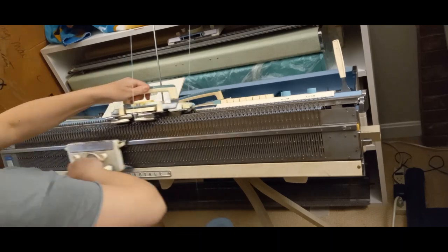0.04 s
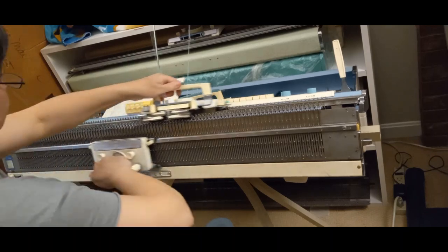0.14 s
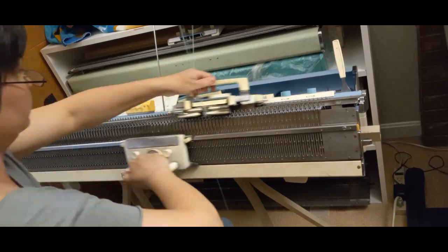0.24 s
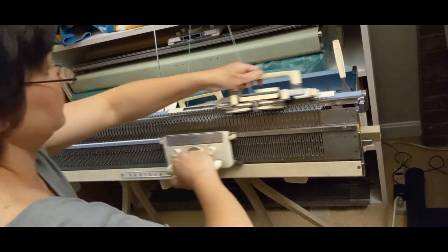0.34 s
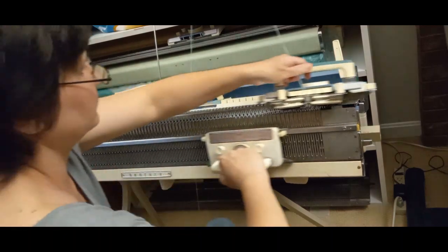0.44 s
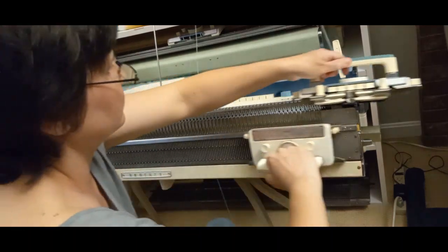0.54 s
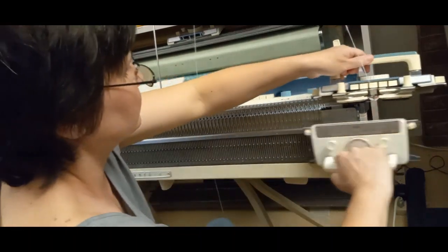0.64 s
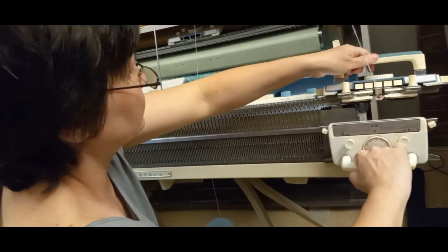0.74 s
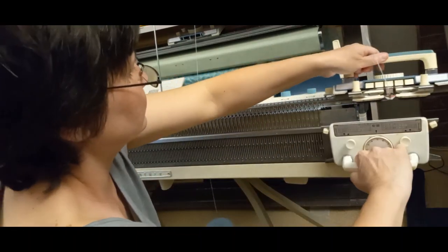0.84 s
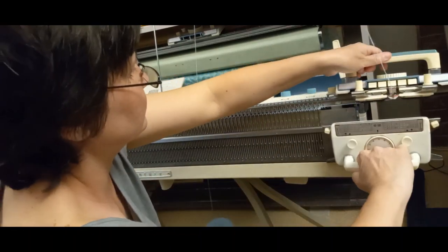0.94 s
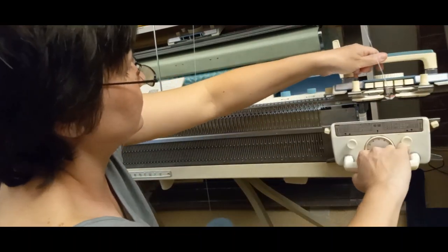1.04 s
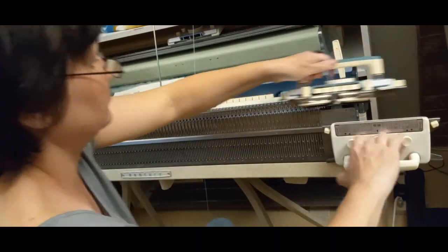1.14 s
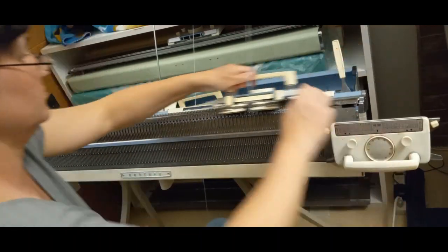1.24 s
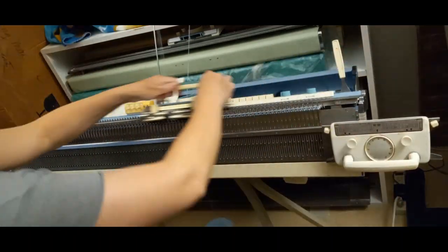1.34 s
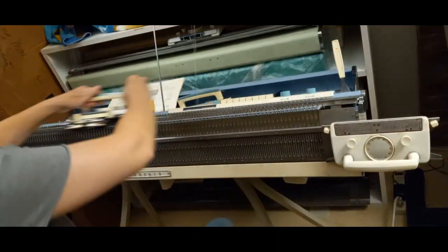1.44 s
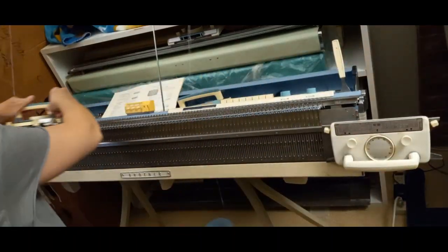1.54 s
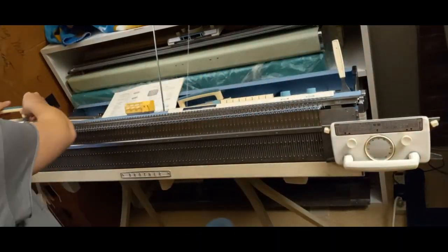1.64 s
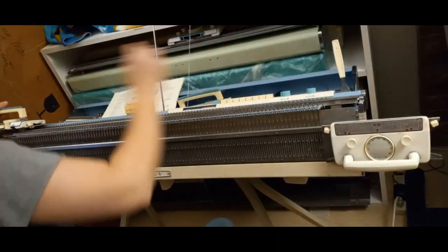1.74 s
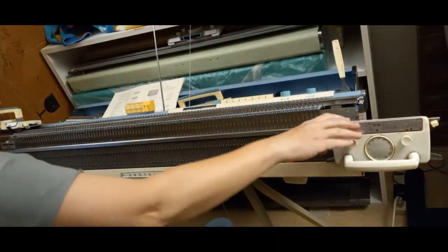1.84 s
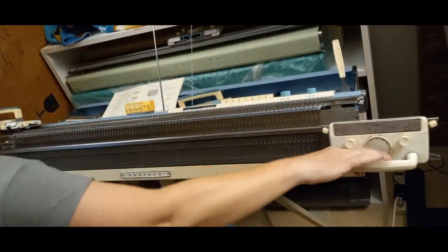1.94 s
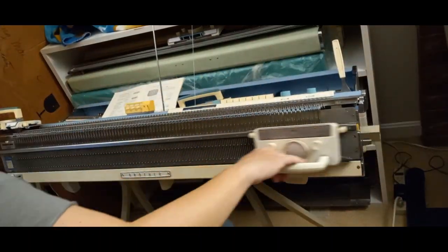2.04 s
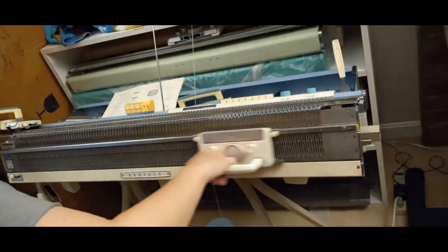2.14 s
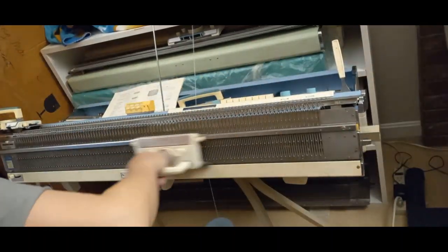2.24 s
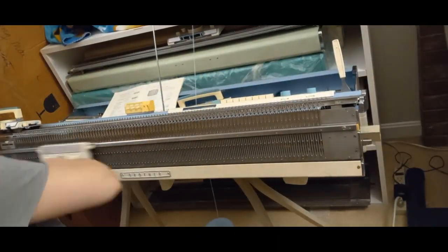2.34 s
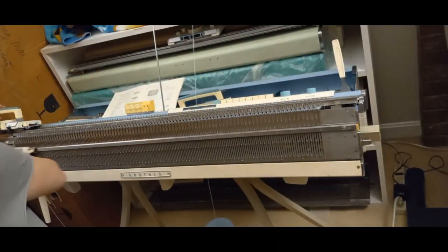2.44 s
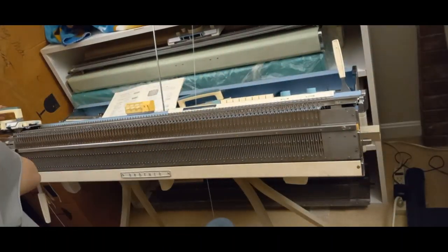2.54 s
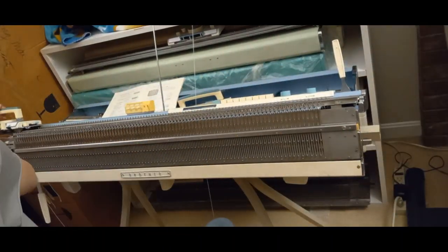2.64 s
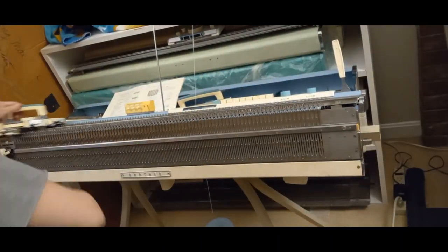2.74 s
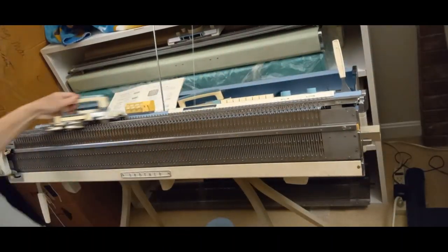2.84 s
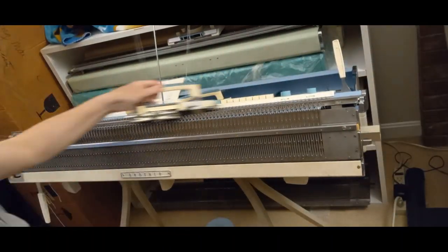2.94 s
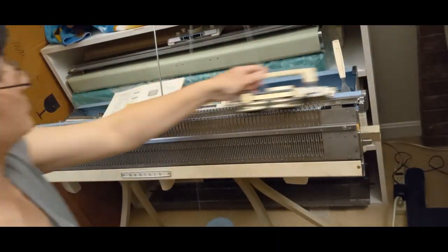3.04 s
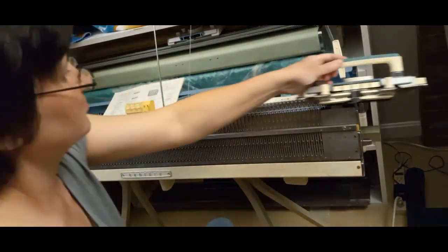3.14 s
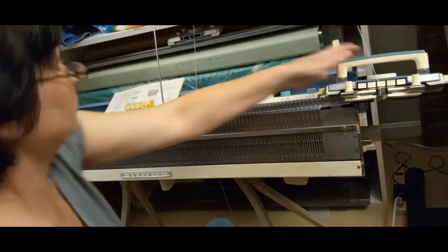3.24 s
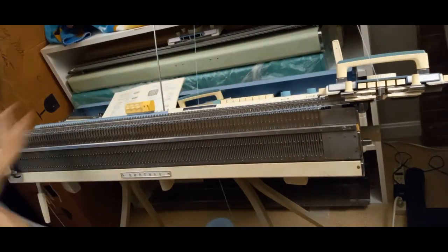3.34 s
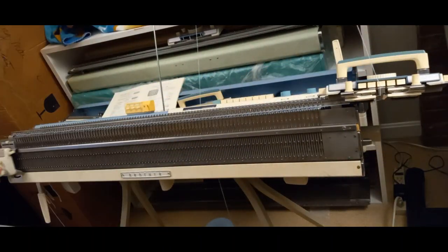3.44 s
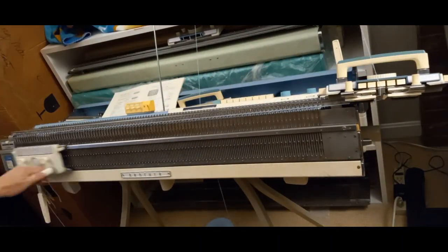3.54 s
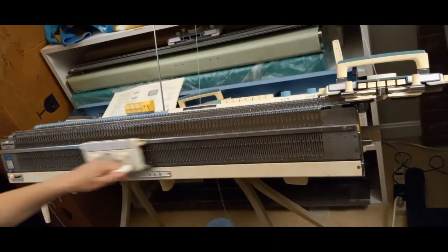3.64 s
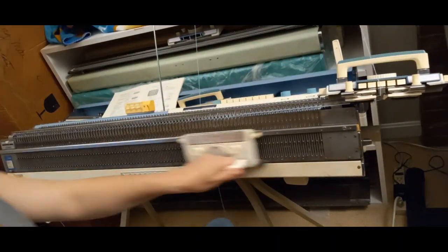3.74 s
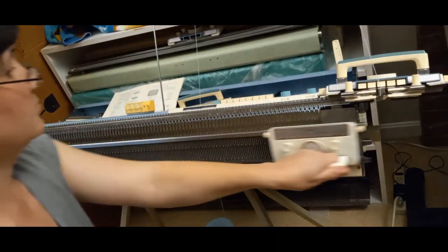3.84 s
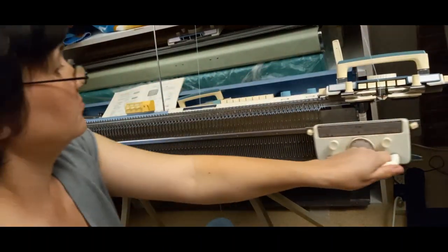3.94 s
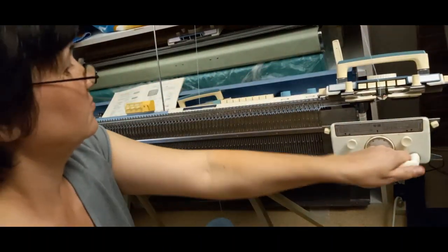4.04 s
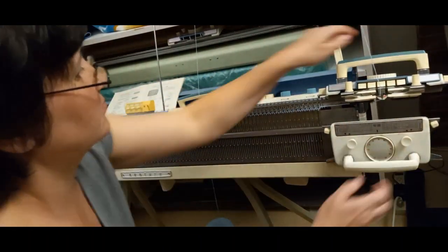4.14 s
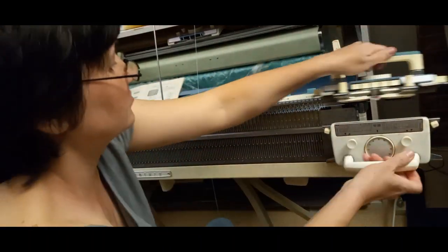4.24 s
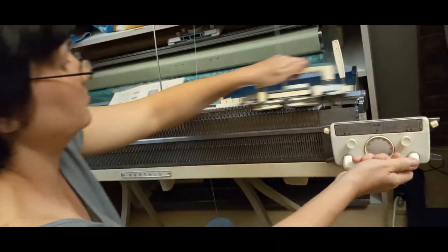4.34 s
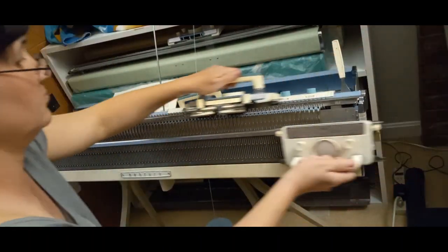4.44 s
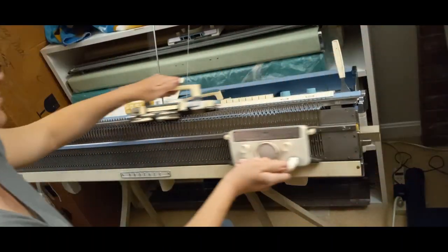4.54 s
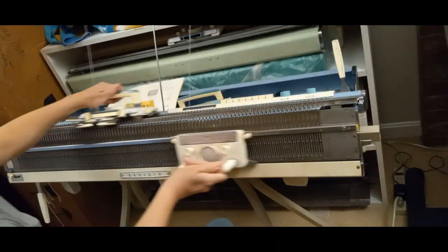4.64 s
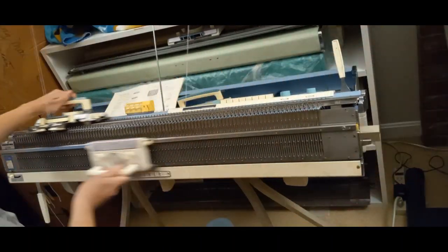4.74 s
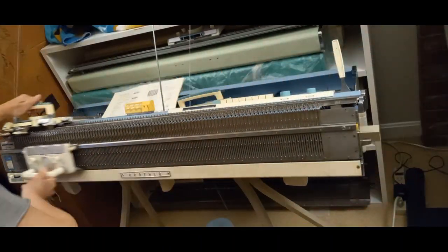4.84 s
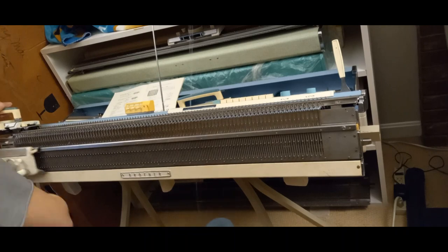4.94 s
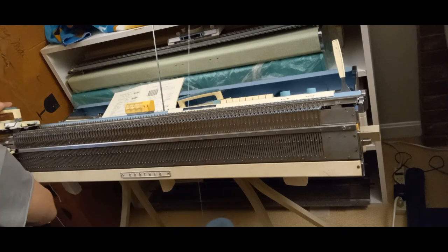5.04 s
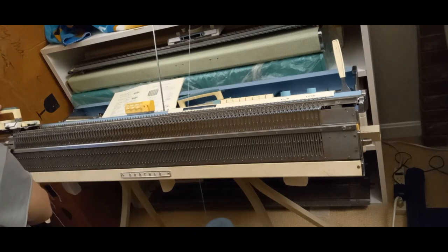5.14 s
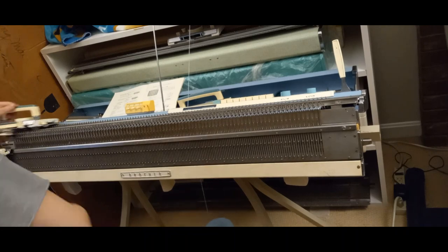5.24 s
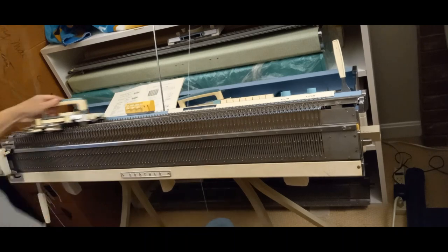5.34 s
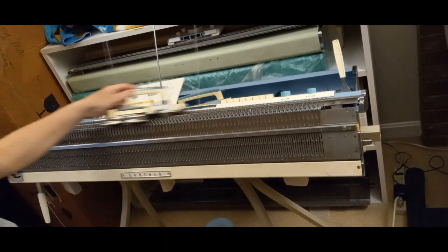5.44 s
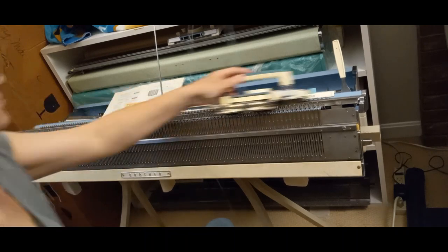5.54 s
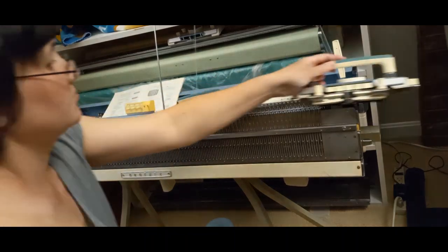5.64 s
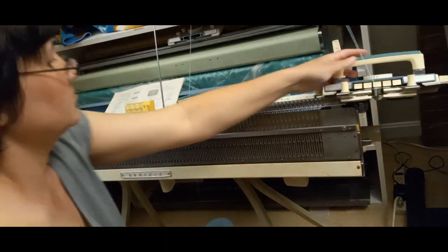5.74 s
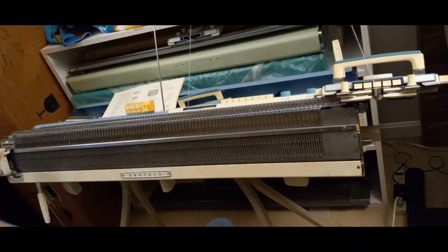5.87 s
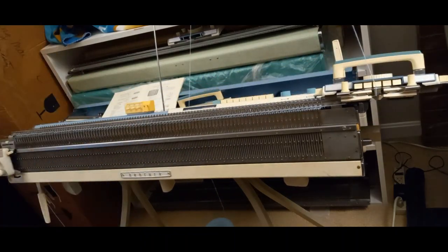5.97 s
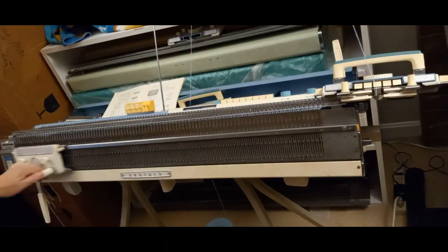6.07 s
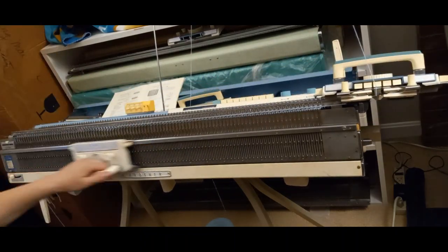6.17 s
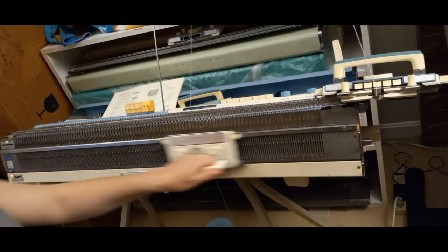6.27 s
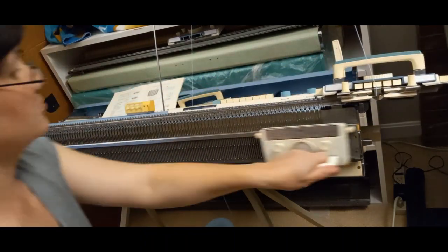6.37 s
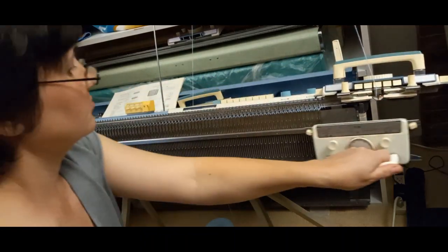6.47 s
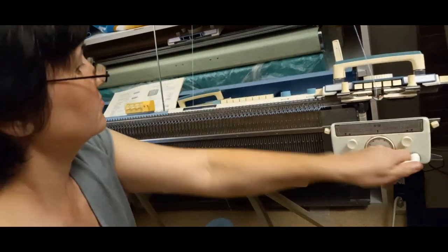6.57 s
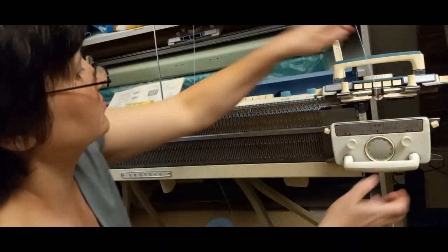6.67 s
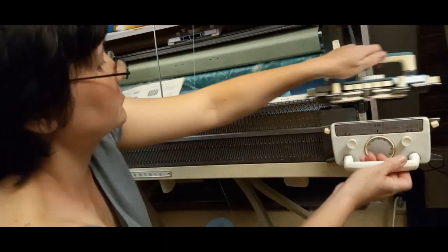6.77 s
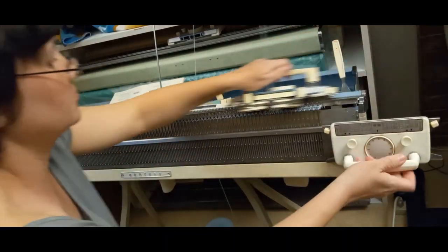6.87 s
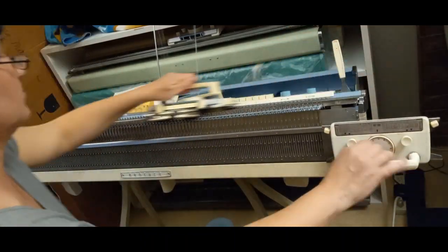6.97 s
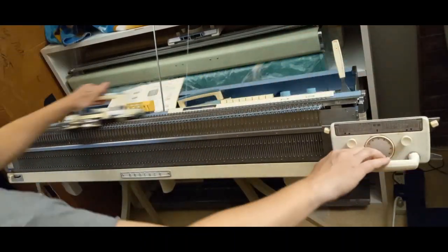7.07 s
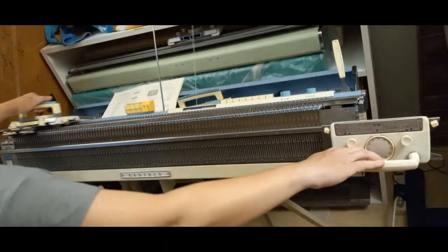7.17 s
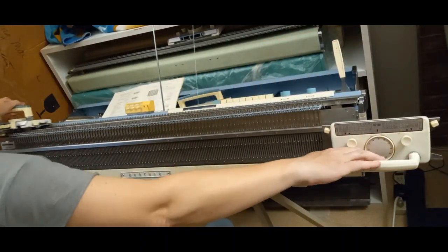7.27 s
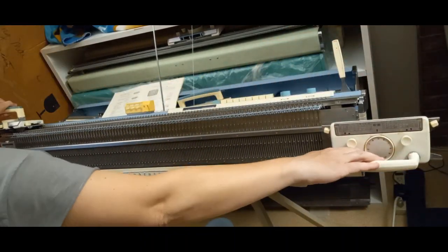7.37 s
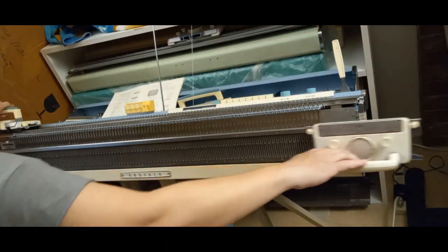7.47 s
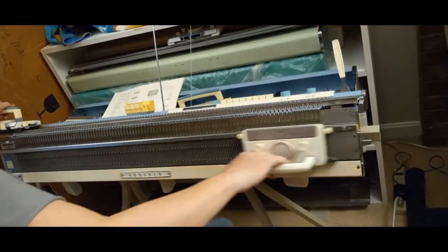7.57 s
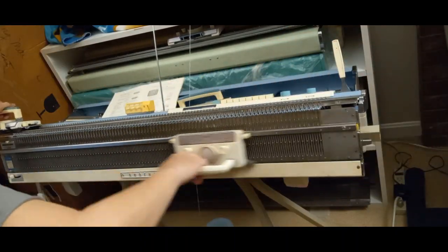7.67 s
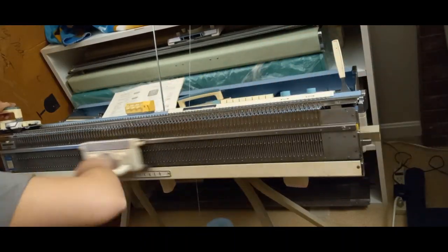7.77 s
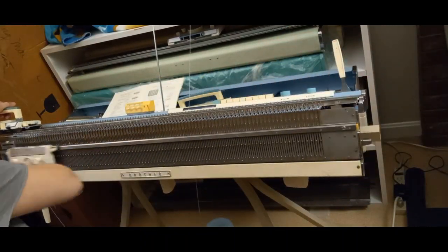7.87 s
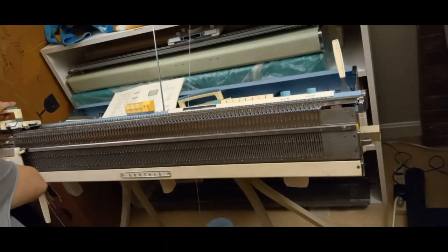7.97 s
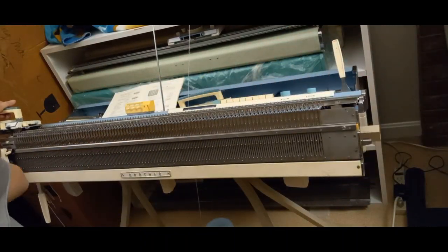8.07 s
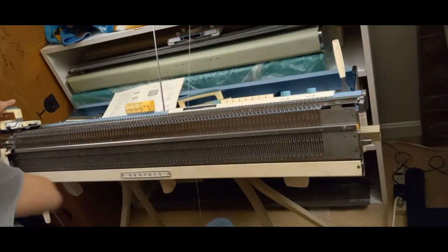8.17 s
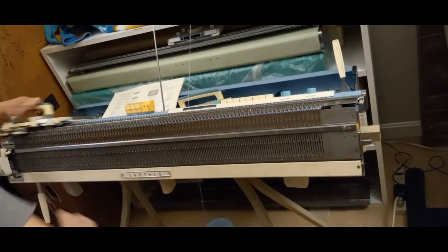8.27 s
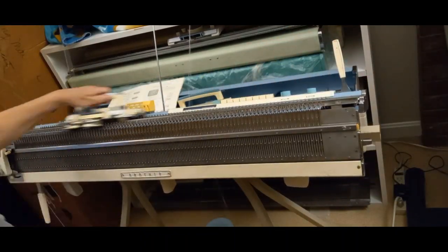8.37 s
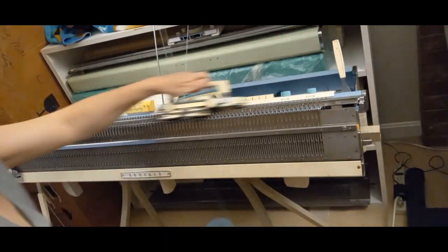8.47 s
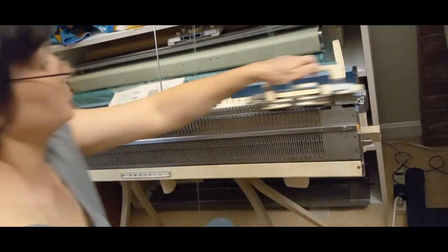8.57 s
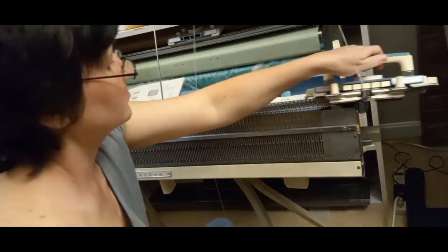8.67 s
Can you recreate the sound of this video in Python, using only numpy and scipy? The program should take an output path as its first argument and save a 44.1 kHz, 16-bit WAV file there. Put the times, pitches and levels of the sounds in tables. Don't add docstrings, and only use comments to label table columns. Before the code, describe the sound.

A hand knitting machine is heard very close in a small room. Two carriages are already sliding, with a gritty metallic rasp and a faint wavering tone near 480 hertz; a sharp snap comes at 0.67 and they stop by 0.75. A lever clacks at 0.98. Rasping passes follow at about 1.2-1.7, 2.05-2.6, 2.8-3.2, 3.5-4.0, 4.3-5.1 (two overlapping carriages), 5.3-5.7, 6.05-6.5, 6.8-7.35 and 7.55-8.1 seconds. Each gathers quickly, rattles densely with bright ringing steel and low shell rumble, then brakes into ticks. Hard snaps strike near 5.35, 6.08 and 8.34; strong lever clacks near 3.5, 5.17 and 6.01. Rests hold small finger ticks, soft rubbing, dull hum and thin hiss. A last bright pass starts at 8.3 and is still sounding or just braking at the end.

```python
import sys
import numpy as np
from scipy import signal
from scipy.fft import rfft, irfft, next_fast_len
from scipy.io import wavfile

SR = 44100
rng = np.random.default_rng(int(sys.argv[2]) if len(sys.argv) > 2 else 0)


def int16_out(signal):
    q = np.round(np.clip(np.atleast_2d(signal).T, -1, 1) * 32767)
    wavfile.write(sys.argv[1], SR, q.astype(np.int16))


def gain_from_db(level_db):
    decades = np.asarray(level_db, float) / 20
    return 10 ** decades


N = 384111


def rms_one(x):
    return x / np.sqrt(np.mean(x ** 2) + 1e-20)


def peak_one(x):
    return x / np.abs(x).max()


def at_bins(points):
    size = next_fast_len(N)
    hz = np.maximum(np.arange(size // 2 + 1) * SR / size, 5)
    table_hz, table_db = np.array(points)[:, 0], np.array(points)[:, 1]
    return np.interp(np.log(hz), np.log(table_hz), table_db)


def shape(x, gain_db):
    size = next_fast_len(N)
    return irfft(rfft(x, size) * gain_from_db(gain_db), size)[..., :N]


def colour(x, points):
    return rms_one(shape(x, at_bins(points)))


def drift(rate):
    r = np.exp(-80 * np.pi * rate / SR)
    noise = rng.standard_normal(N // 40 + 2002)
    slow = signal.lfilter([1], [1, -2 * r, r * r], noise)[2000:]
    return np.interp(np.arange(N) / 40, np.arange(len(slow)), rms_one(slow))


def struck(x, hz, radius):
    w = 2 * np.pi * hz / SR
    return signal.lfilter([0, np.sin(w)], [1, -2 * radius * np.cos(w), radius ** 2], x)


def resonances(x, peaks, patchy_db, rate):
    out = 0
    for k, (hz, width_hz, level_db) in enumerate(peaks):
        r = np.exp(-np.pi * width_hz / SR)
        poles = [1, -2 * r * np.cos(2 * np.pi * hz / SR), r * r]
        band = signal.lfilter([1, 0, -1], poles, x) * (1 - r * r) / 2
        out = out + (-1) ** k * gain_from_db(level_db + patchy_db * drift(rate)) * band
    return rms_one(out)


def rattle(per_s, spread_db, alike):
    chance, luck = rng.random((3, N)), rng.random((3, N))
    hit, sizes = chance < per_s / SR, np.zeros((3, N))
    uneven = -np.log(np.abs(2 * luck[hit] - 1) + 1e-9)
    sizes[hit] = gain_from_db(spread_db * np.minimum(uneven, 4)) * np.sign(luck[hit] - .5)
    both, left, right = sizes / np.sqrt(per_s)
    alike = np.clip(alike, 0, 1)
    return rms_one(np.sqrt(alike) * both + np.sqrt(1 - alike) * np.array([left, right]))


def room_levels():
    # start_s, end_s, hum_db, hiss_start_db, hiss_end_db
    pauses = [(0.764, 1.133, -48, -50, -49), (1.733, 2.005, -49, -61, -46), (2.61, 2.78, -53, -62, -61),
              (3.26, 3.47, -50, -51, -52), (4.04, 4.273, -51, -63, -52), (5.2, 5.3, -48, -65, -52),
              (5.77, 6.015, -50.5, -64, -45), (6.575, 6.803, -50.5, -56, -51), (7.383, 7.53, -50, -58, -46),
              (8.112, 8.3, -49.5, -54, -50.5)]
    # middle_s, half_length_s, level_db
    hand_rubs = [(1.07, 0.1, -53), (1.983, 0.06, -53), (2.615, 0.066, -56), (3.363, 0.077, -46.5),
                 (4.05, 0.13, -52.5), (5.19, 0.065, -53), (5.793, 0.044, -53), (6.604, .05, -65),
                 (7.385, .05, -63), (8.115, 0.035, -50)]
    rub_rest_db = -60.5
    recovery_db_per_s = 16
    t = np.arange(N) / SR
    start, end, hum_db, *hiss_db = np.transpose(pauses)
    s = np.ravel([start, end], "F")
    open_s = np.ravel([0 * start, end - start], "F")
    rub = gain_from_db(rub_rest_db)
    rub = rub + sum(gain_from_db(db) * np.exp(-((t - mid) / half) ** 2) for mid, half, db in hand_rubs)
    hum = gain_from_db(np.interp(t, s, np.repeat(hum_db, 2) + recovery_db_per_s * open_s))
    hiss = gain_from_db(np.interp(t, s, np.ravel(hiss_db, "F")))
    return hum, rub, hiss


def room_tone():
    # frequency_hz, density_db
    hum_spectrum = [(90, -26), (200, -13), (324, 1), (480, -1.5), (620, -7), (1000, -9.5), (1500, -18),
                    (3000, -26)]
    hiss_spectrum = [(200, -45), (1000, 9), (3000, 2.5), (6000, -1), (10000, -4.5), (16000, -5)]
    # frequency_hz, width_hz, level_db
    hum_tones = [(331, 12, 0), (487.4, 3.4, 3.5)]
    rub_peaks = [(1250, 180, 4.5), (1590, 1200, 0), (1750, 110, 5), (2140, 550, -10)]
    hum_gain, rub_gain, hiss_gain = room_levels()
    noise = rng.standard_normal((5, N))
    shared = 0.48 * noise[0] + noise[1:3]
    tones = resonances(shared[::-1], hum_tones, patchy_db=7.5, rate=9.0)
    hum = colour(shared, hum_spectrum) + gain_from_db(-6.5) * colour(tones, hum_spectrum)
    rub = resonances(rattle(per_s=1500, spread_db=3.0, alike=0.45), rub_peaks, patchy_db=2.5, rate=16)
    rub = signal.sosfilt(signal.butter(2, [900, 3000], "band", fs=SR, output="sos"), rub)
    out = hum * hum_gain * gain_from_db(-2.0 + 1.1 * drift(6.8)) + rub * rub_gain * gain_from_db(-3.0)
    return out + colour(noise[3:], hiss_spectrum) * hiss_gain * gain_from_db(-1 + 1.3 * drift(24))


def room(x):
    t60_s = 0.8
    t = np.arange(12000) / SR
    tail = rng.standard_normal((2, len(t))) * gain_from_db(-60 * t / t60_s) * (t > .004)
    tail = signal.lfilter([.5], [1, -.5], tail)
    return signal.fftconvolve(x, tail / np.sqrt(np.sum(tail ** 2) / 2), axes=1)[:, :N]


def squeal():
    start_s, end_s, pitch_hz = .09, .72, 480
    level_db, sag_db_per_s = -40.5, 8
    t = np.arange(N) / SR
    phase = 2 * np.pi * np.cumsum(pitch_hz + 3.5 * drift(21)) / SR
    fade = np.clip(np.minimum(t - start_s, end_s - t) / .05, 0, 1)
    return fade * gain_from_db(level_db - sag_db_per_s * t + 2.3 * drift(13)) * np.sin(phase)


def tick_list():
    # start_s, peak_db, top_minus_peak_db
    stops = [(0.724, -34, -8), (1.6993, -21.5, 3.5), (2.58, -21, -3.5), (3.2296, -24.5, 2.5),
             (4.02, -28.5, -2), (5.096, -23.5, -4), (5.7445, -25.5, 5.5), (6.554, -22.5, -6),
             (7.3511, -20, 1.5), (8.081, -22, -3)]
    # start_s, peak_db, ring_minus_peak_db, ring_hz, top_minus_peak_db
    levers = [(0.9795, -11, -16, 2040, -14.5), (1.9023, -34, 2.5, 3950, 9.5), (3.489, -14.5, -9, 1900, -21),
              (4.28, -28, -22, 1900, 6.5), (5.1716, -10, -14.5, 1816, -20),
              (6.0133, -13.5, -6.5, 1860, -10), (6.642, -26.5, 0.5, 3950, -18)]
    # start_s, peak_db,
    # ring_minus_peak_db
    catches = [(0.661, -19, -17), (1.1873, -24, -22), (1.558, -20, -17), (2.037, -28, -2),
               (2.0537, -9, -12), (2.8233, -26, -15), (3.498, -23, -4), (3.5394, -12.5, -8),
               (4.3194, -28, 2), (5.012, -16.5, -7), (5.3284, -28, -28), (6.024, -23, -6),
               (6.0795, -20, -6), (7.546, -26, -23), (7.568, -14, -10), (7.604, -13, -6),
               (8.322, -15.5, -17)]
    # start_s, peak_db, ring_hz, top_minus_peak_db
    touches = [(1.1293, -36, 2110, 1), (1.1626, -47, 1310, -12), (2.0144, -35, 1460, -14),
               (2.63, -44, 1790, -15), (2.652, -41, 1800, -16), (3.3045, -35.5, 1714, -8),
               (3.3796, -33.5, 1750, -11), (4.127, -38, 3800, -15), (4.1864, -52, 1100, 4),
               (5.152, -39, 1250, -14), (5.2714, -46, 1230, -6), (5.8177, -36.5, 1740, -4),
               (5.922, -57, 1120, -11), (6.801, -33, 1330, -1.5), (6.844, -25, 1330, -6),
               (8.256, -42, 1190, -12)]
    ticks_all = [(s, db, -13.5, 1900, top_db, 0.048) for s, db, top_db in stops]
    ticks_all += [(*row, 0.044) for row in levers]
    ticks_all += [(s, db, ring_db, 1687, -5, 0.034) for s, db, ring_db in catches]
    ticks_all += [(s, db, -4.5, hz, top_db, 0.073) for s, db, hz, top_db in touches]
    return ticks_all


def ticks():
    # multiple_of_ring_hz, level_db, multiple_of_t60
    latch_modes = [(1, -7.5, 1.1), (.84, -19, .8), (1.17, -10.5, .8)]
    spring_hz, spring_width_hz = 3800, 2300
    out, span = np.zeros((2, N + SR)), 5000
    t = np.arange(span) / SR
    body = signal.butter(2, [2300, 7000], "band", fs=SR, output="sos")
    bright = signal.butter(2, 6500, "high", fs=SR, output="sos")
    small = signal.butter(3, 1250, "high", fs=SR, output="sos")
    for s, peak_db, ring_db, centre_hz, top_db, t60 in tick_list():
        t60 = max(t60, .01)
        fall = (gain_from_db(-60 * t / t60) + 1.4 * gain_from_db(-60 * t / 0.0018)) * np.minimum(t / 0.00025, 1)
        chatter, fizz = rng.standard_normal((2, 2, span)) * fall
        chatter = chatter + 0.18 * chatter[::-1]
        spring = struck(chatter, spring_hz, np.exp(-np.pi * spring_width_hz / SR))
        snap = signal.sosfilt(body, chatter) + 0.52 * spring
        ring = 0.25 * peak_one(struck(chatter, centre_hz, np.exp(-np.pi * 600 / SR)))
        blow = (t == t[20]) + 0.088 * chatter
        shorter = min(1, 1900 / centre_hz) ** 2
        for ratio, level_db, longer in latch_modes:
            radius = gain_from_db(-60 / (longer * t60 * SR * shorter))
            ring += gain_from_db(level_db) * struck(blow, ratio * centre_hz, radius)
        tick = gain_from_db(2.0) * peak_one(snap) + gain_from_db(top_db + 9.5) * peak_one(signal.sosfilt(bright, fizz))
        tick += gain_from_db(ring_db + 5.0) * peak_one(ring)
        at = round(s * SR)
        out[:, at:at + span] += gain_from_db(peak_db) * signal.sosfilt(small, tick)
    return out[:, :N]


def snaps():
    # start_s, peak_db, left_minus_right_db
    needles = [(0.671, 4, -8), (1.557, -18, 0.0), (2.054, -10, 0.5), (2.826, -9, 0.5), (3.55, -14, 0.5),
               (4.017, -13.5, -5), (4.974, -18, 11), (5.012, -7, 1.0), (5.059, -21, 0.0), (5.094, -8.5, -8),
               (5.345, 2, 5), (6.079, 3, -1), (6.553, -21, -18), (8.34, 2, 0.5)]
    out = np.zeros((2, N))
    for s, peak_db, pan_db in needles:
        out[:, round((s + .0015) * SR)] = gain_from_db(peak_db + np.array([.5, -.5]) * pan_db)
    return signal.lfilter([.9, .3, -.5], [1, -.55], out)


def pass_controls():
    # full_speed_s, brake_s, rest_s, full_speed_db, brake_start_db
    back_right = [(2.821, 3.136, 3.225, -22.5, -28), (5.332, 5.652, 5.73, -23, -27),
                  (8.341, 8.646, 8.73, -22.5, -28)]
    back_left = [(1.24, 1.589, 1.68, -25.5, -23.5), (4.373, 4.893, 5.03, -25.5, -28),
                 (6.896, 7.176, 7.36, -25, -24)]
    front_right = [(3.543, 3.903, 4.008, -23.5, -29.5), (6.084, 6.456, 6.545, -24, -29)]
    front_left = [(2.067, 2.486, 2.58, -25.5, -29), (4.62, 5.009, 5.1, -28.5, -32.5),
                  (7.592, 7.984, 8.09, -24.5, -30.5)]
    opening_back = [(0.0, 0.59, 0.75, -28.5, -29)]
    opening_front = [
        (0.0, 0.59, 0.74, -30.5, -33.5),
        (0.672, 0.694, 0.742, -26, -28),
    ]
    # rise_s, breakaway_loss_db, front_bed_share (0-1), plate_minus_rasp_db
    pushes = [
        (0.024, -16, 0.04, -11.5),
        (0.093, -27.5, 0.02, -11),
        (0.035, -26, 0.8, -13.5),
        (.045, -14, 0.95, -12),
    ]
    # grit_minus_rasp_db, grit_gain_over_pass_db, rumble_minus_rasp_db, rumble_gain_over_pass_db
    mixes = [
        (-0.5, -0.5, -5.5, -3),
        (-1.5, -1.5, -4.5, -4.5),
        (0, 3, -2.5, -11.5),
        (0.5, 2.5, -9, 1),
    ]
    gather_power, stick_db_per_s = 1.2, 3000
    brake_loss_db, brake_power = -23, 1.45
    halt_db_per_s = 500
    jolt_db, jolt_s = 1.5, 0.013
    creep_db, slow_dull_db = 12.5, -4.5

    t, power, front = np.arange(N) / SR, np.zeros((4, N)), np.zeros(N)
    kinds = (opening_back + back_right, back_left, opening_front + front_right, front_left)
    for rows, push, mix in zip(kinds, pushes, mixes):
        rise_s, start_db, share, plate_db = push
        grit_db, grit_gain_db, rumble_db, rumble_gain_db = mix
        for full_s, brake_s, rest_s, full_db, brake_db in rows:
            on = (t > full_s - rise_s - .05) & (t < rest_s + .1)
            s = t[on]
            along = np.clip((s - full_s) / (brake_s - full_s), 0, 1)
            slow = np.maximum(full_s - s, 0) / rise_s
            braked = np.maximum(s - brake_s, 0) / (rest_s - brake_s)
            creep = np.minimum(slow + braked, 1)
            lost_db = start_db * slow ** gather_power + brake_loss_db * braked ** brake_power
            lost_db -= stick_db_per_s * np.maximum(full_s - rise_s - s, 0)
            lost_db -= halt_db_per_s * np.maximum(s - rest_s, 0)
            rasp_db = full_db + (brake_db - full_db) * along + lost_db
            thump_db = jolt_db * np.exp(-np.abs(s - full_s) / jolt_s) + creep_db * creep
            layers_db = [0 * s,
                         grit_db + grit_gain_db * along + slow_dull_db * creep,
                         rumble_db + rumble_gain_db * along + thump_db,
                         plate_db + 0 * s]
            power[:, on] += gain_from_db(rasp_db + layers_db) ** 2
            front[on] += np.clip(share, 0, 1) * gain_from_db(rasp_db) ** 2
    return np.sqrt(power), np.clip(front / (power[0] + 1e-30), 0, 1)


def carriages():
    # frequency_hz, width_hz, level_db
    back_bed = [(2737, 220, 6), (3285, 51, 5.5), (4420, 1120, 5)]
    front_bed = [(3390, 130, 0.5), (4170, 240, 9.5), (5800, 200, 3)]
    plate_peaks = [(1520, 130, -7.5), (1860, 250, 6.5), (1935, 460, 0.5)]
    cam_peaks = [(2060, 1000, -7), (3590, 950, -0.5), (5800, 810, -4)]
    shell_peaks = [(287, 174, -0.5), (475, 79, 5.5), (685, 540, -1.5), (1340, 290, 4)]
    # frequency_hz, density_db
    grit_spectrum = [(20, -3), (200, -5), (1000, -6), (4000, -3), (8000, -1), (12000, -2), (16000, -1.5)]
    full_speed_db = -27
    (rasp, grit, rumble, ring), front = pass_controls()
    speed = np.clip(rasp / gain_from_db(full_speed_db), .12, 1)
    butts = rattle(3000.0 * speed, spread_db=3.0, alike=0.28)
    bed = np.sqrt(1 - front) * resonances(butts, back_bed, patchy_db=3.0, rate=5.2)
    bed += np.sqrt(front) * resonances(butts, front_bed, patchy_db=1.5, rate=6)
    plate = resonances(butts, plate_peaks, patchy_db=2.5, rate=7.3)
    latches = rattle(5000.0 * speed, spread_db=2.0, alike=0.21)
    cams = resonances(latches, cam_peaks, patchy_db=0.0, rate=4.2)
    shell = resonances(latches, shell_peaks, patchy_db=1.5, rate=6.4)
    fine = colour(rattle(9000.0 * speed, spread_db=3.0, alike=0.011) + 0.27 * butts, grit_spectrum)
    judder = gain_from_db(0.57 * drift(37) + 0.7 * drift(92))
    steel = rasp * (gain_from_db(-5) * bed + gain_from_db(-4.0) * cams) + grit * gain_from_db(6) * fine + ring * plate
    return judder * steel + rumble * gain_from_db(-3.0) * shell


def scene():
    reverb_db = -27
    hits = ticks() + snaps()
    return room_tone() + gain_from_db(reverb_db) * room(hits) + hits + squeal() + carriages()


def band_limit(x):
    return signal.sosfilt(signal.butter(12, 16990, fs=SR, output="sos"), x)


def record(dry):
    # frequency_hz, difference_db
    tilt = [(100, -2.5), (1000, -1.4), (3000, -0.1), (12000, 0.1)]
    cutoff_hz = 15730
    capsules = shape(dry, np.array([[.5], [-.5]]) * at_bins(tilt))
    rounded = 0.95 * np.tanh(capsules / 0.95)
    mix = signal.sosfilt(signal.ellip(18, .5, 95, cutoff_hz, fs=SR, output="sos"), rounded)
    return band_limit(mix)


dry = scene()
out = record(dry)
int16_out(out)
```